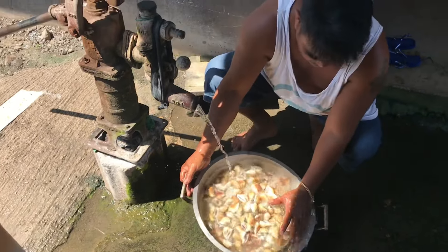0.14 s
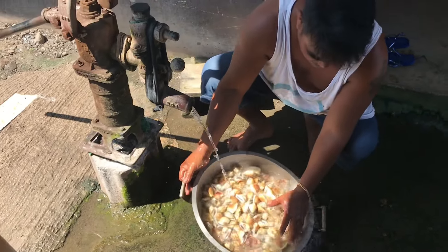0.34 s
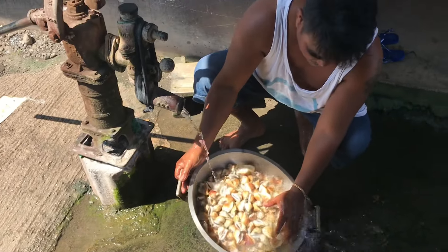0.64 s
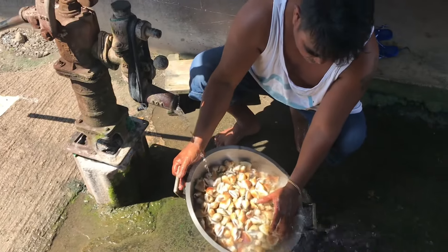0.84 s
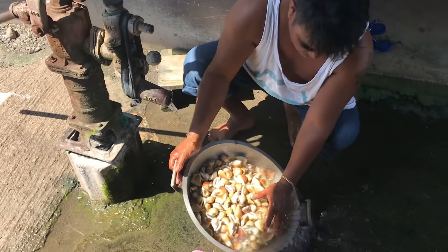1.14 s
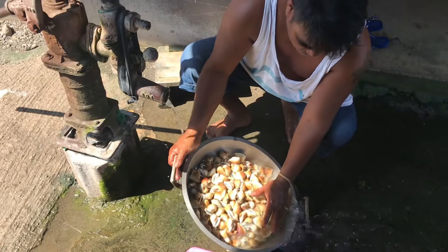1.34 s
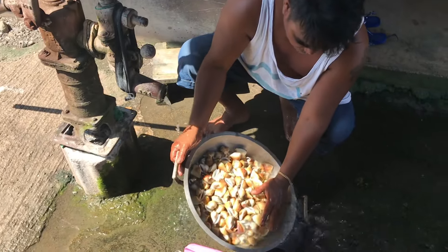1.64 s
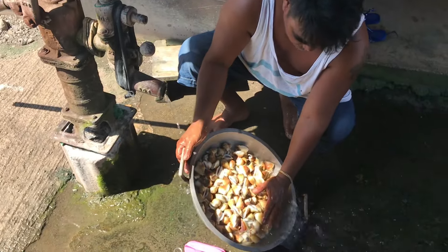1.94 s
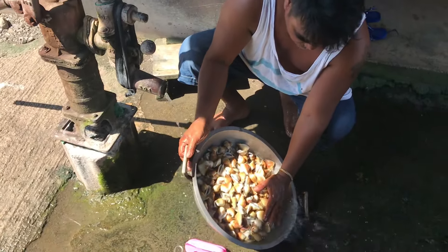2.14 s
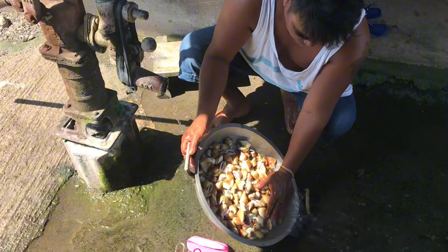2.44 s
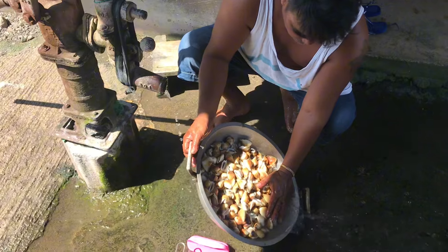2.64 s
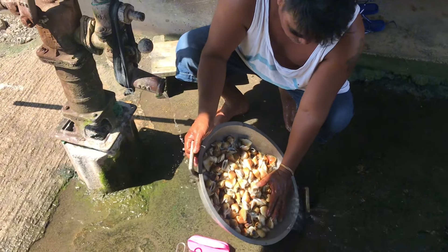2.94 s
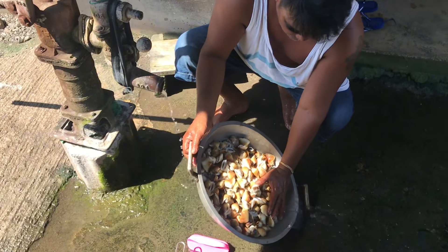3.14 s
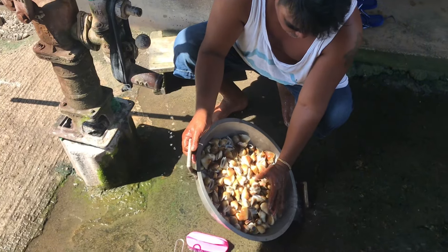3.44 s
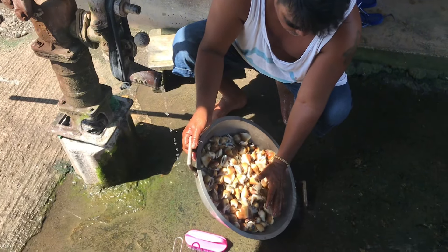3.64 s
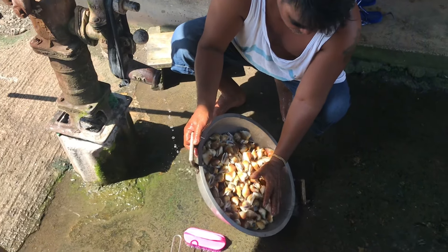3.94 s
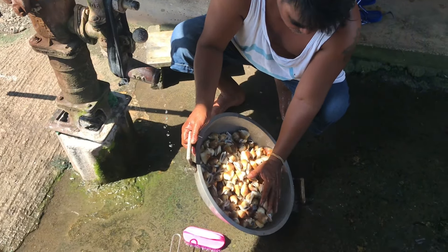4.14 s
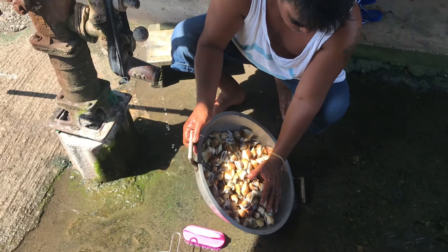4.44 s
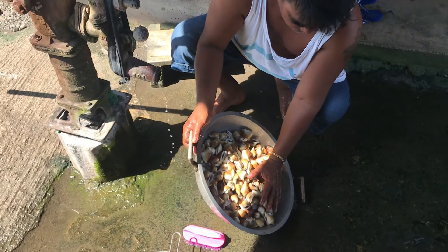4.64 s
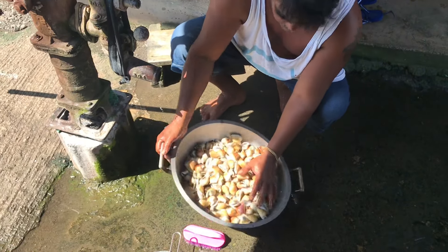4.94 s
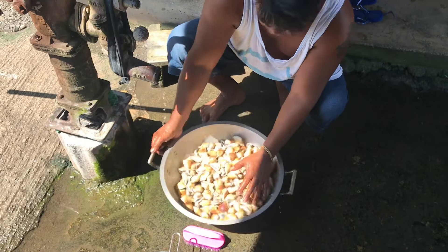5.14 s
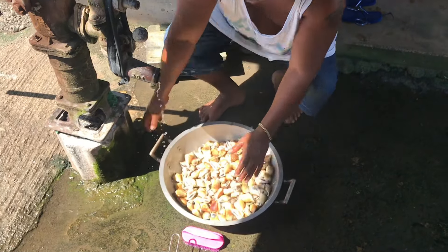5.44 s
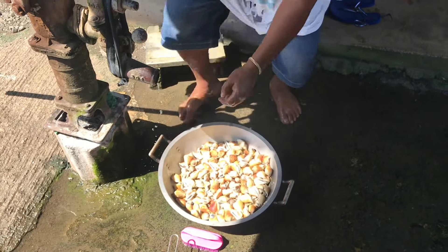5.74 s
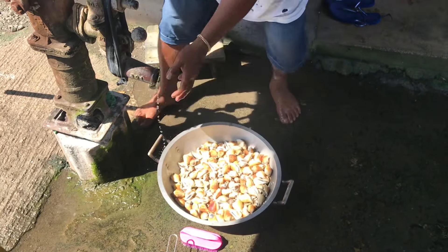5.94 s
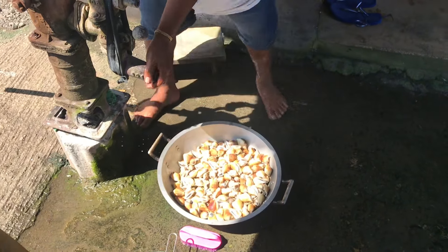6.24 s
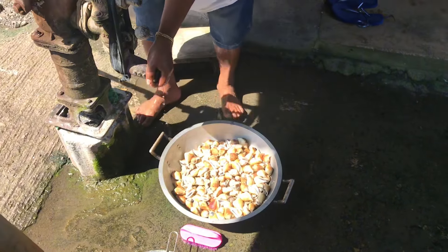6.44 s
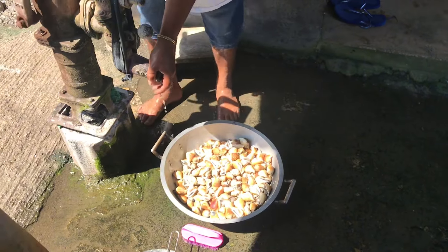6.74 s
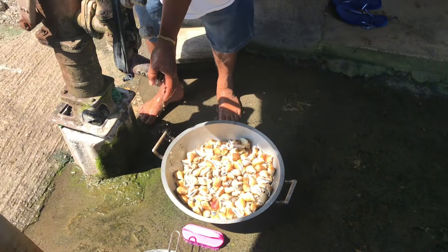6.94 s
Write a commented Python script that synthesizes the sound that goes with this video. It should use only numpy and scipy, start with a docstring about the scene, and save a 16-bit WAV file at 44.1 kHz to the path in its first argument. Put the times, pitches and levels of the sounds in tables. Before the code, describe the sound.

Shells click and slide in a draining metal basin, hit hardest as it is set down; later a loose iron pump handle clanks repeatedly.

```python
"""Shells clink and slide in a metal basin being drained and shaken beside an iron hand pump on a concrete yard.
Each clink is a noise crack with sine rings; a handle pings on its lug and the basin is set down with a crunch.
Then the pump lever clanks as ringing iron modes with a noise crash, and its pivot hisses in narrow bands.
Water spatters and gurgles away as noise, ringing clicks and rising sines.
A far engine is narrow noise bands; rumble and insects are a steady bed of coloured noise."""
import sys
import numpy as np
from scipy import signal
from scipy.fft import rfft, irfft
from scipy.io import wavfile

SR = 44100
rng = np.random.default_rng(int(sys.argv[2]) if len(sys.argv) > 2 else 0)


def transcribe(signal):
    """Save signal, clipped to [-1, 1], as a 16-bit WAV file at the path in sys.argv[1]."""
    frames = np.atleast_2d(signal).T
    limited = np.clip(frames, -1, 1)
    pcm = np.round(limited * 32767).astype(np.int16)
    wavfile.write(sys.argv[1], SR, pcm)


N = 311787
TIME = np.arange(N) / SR
EDGES = 25 * 2 ** np.arange(0, 9.5, 1 / 3)   # third-octave band edges, f/Hz
CENTRES = np.sqrt(EDGES[1:] * EDGES[:-1])

# Event and curve levels are mix settings; some source functions trim them further.
# shell clinks: [t/s, level/dB, hollow f/Hz, weight/dB, brightness/dB, edge/dB, rim f/Hz, crack t60/s,
# settling re crack/dB]
SHELL_CLINKS = [(0.0054, -33, 3320, -29, -4, -11, 6820, 0.024, -11),
                (0.0288, -22.5, 3360, -40, -14.5, -19, 7700, 0.014, -20),
                (0.045, -33, 3560, -28, -4, -15, 6400, 0.022, -17),
                (0.0745, -34, 3160, -42, -14, -6, 9140, 0.03, -16),
                (0.1394, -26, 5220, -49, -19, -19, 9200, 0.018, -19),
                (0.169, -34, 3040, -27, -15, -21, 7100, 0.023, -24),
                (0.2254, -28.5, 3270, -43, -21, -25, 10900, 0.023, -21),
                (0.2537, -27.5, 4180, -40, -23, -20, 8600, 0.024, -19),
                (0.2815, -37, 3430, -45, -15, -12, 11500, 0.032, -23),
                (0.319, -29, 3580, -53, -20, -25, 8920, 0.032, -27),
                (0.3601, -58, 2480, -28, -19, -10, 11000, 0.023, -23),
                (0.3701, -45, 2300, -44, -18, 4, 13000, 0.018, -19),
                (0.413, -25, 4000, -49, -15, -35, 7150, 0.022, -13.5),
                (0.4596, -28, 2600, -35, -8, -30, 6980, 0.021, -22),
                (0.4848, -26, 4580, -23, -19, -21, 6890, 0.034, -20),
                (0.5177, -35, 3660, -11, -9, -24, 7000, 0.025, -19),
                (0.5496, -26, 3230, -35, -7, -20, 6300, 0.021, -38),
                (0.5588, -26.5, 5730, -42, -9, -10, 6840, 0.023, -32),
                (0.6564, -31, 2180, -22, -25, -3, 11300, 0.018, -19),
                (0.9214, -32, 3140, -26, -8, -31, 6860, 0.023, -22),
                (0.9956, -26.5, 4800, -27, -26, -27, 8840, 0.021, -28),
                (1.1134, -33, 3000, -23, -28, -29, 11700, 0.035, -19),
                (1.168, -35.5, 3100, -15, -36, -24, 6720, 0.033, -24),
                (1.1858, -32, 3120, -17, -27, -24, 6580, 0.038, -20),
                (1.269, -36, 3250, -14, -15, -6, 11200, 0.011, -10),
                (1.2974, -37, 2940, -22, -26, -16, 6510, 0.022, -6),
                (1.3304, -33, 2770, -26, -20, -18, 8910, 0.024, -19),
                (1.3808, -41, 3930, -28, -9, -20, 7240, 0.023, -24),
                (1.4002, -37, 4460, -25, -13, -11, 12700, 0.02, -22),
                (1.4212, -32, 3400, -30, -19, -11, 11400, 0.025, -24),
                (1.4897, -36, 4540, -26, -13, -27, 6810, 0.02, -15),
                (1.5224, -38, 2950, -14, -22, -31, 7220, 0.035, -19),
                (1.6164, -34.5, 4500, -11, -21, -28, 7210, 0.036, -21),
                (1.6506, -40, 3320, -19, -28, -29, 6780, 0.017, -9),
                (1.7404, -29, 3130, -29, -30, -32, 8110, 0.029, -24),
                (1.7679, -33, 4020, -14, -21, -20, 11100, 0.042, -15),
                (1.8466, -35, 3340, -28, -20, -23, 11200, 0.027, -19),
                (1.8844, -26, 3960, -49, -27, -21, 13700, 0.027, -16),
                (1.952, -38.5, 5460, -19, -2, -5, 6920, 0.022, -7),
                (1.987, -24, 3570, -19, -11, -14, 6520, 0.02, -18),
                (2.0688, -35.5, 5140, -27, -19, -9, 11000, 0.027, -11),
                (2.145, -32, 3000, -16, -19, -20, 8770, 0.018, -31),
                (2.156, -33, 5860, -6, 2, -13, 8370, 0.021, -25),
                (2.1909, -37, 3000, -14, -15, -18, 8500, 0.011, -5.5),
                (2.296, -52, 2260, -24, -24, -23, 12700, 0.021, -19),
                (2.379, -22.5, 3560, -21, -23, -42, 8520, 0.025, -15.5),
                (2.4843, -41, 3500, -30, -15, -6, 8520, 0.027, -19),
                (2.498, -30.5, 3130, -20, -14.5, -26, 6700, 0.025, -18),
                (2.5561, -44, 3480, -6, -21, -15, 8550, 0.027, -27),
                (2.604, -49, 2920, -17, -10, -2, 9480, 0.027, -32),
                (2.6718, -58, 2380, -17, -10, -22, 9500, 0.016, -23),
                (2.7585, -47, 2900, -24, -12, -14, 6650, 0.027, -8),
                (2.8534, -44.5, 3500, -15, -26, -13, 12500, 0.027, -16),
                (2.9258, -47.5, 2430, -11, -35, -3, 9220, 0.027, 0.5),
                (3.015, -47.5, 3370, -5, -3, -9, 9100, 0.021, -7),
                (3.0737, -30, 3960, -7.5, -15, -19, 8860, 0.023, -35),
                (3.1167, -23, 3230, -19, 2, -4, 11700, 0.012, -34),
                (3.1315, -24, 3360, -7, -7.5, -20, 8700, 0.025, -30),
                (3.1477, -29, 3120, -6.5, -11, -22, 8860, 0.044, -18),
                (3.1966, -15.5, 3380, -41, -24.5, -50, 7800, 0.018, -27),
                (3.3527, -42, 3400, -16, -35, -26, 8200, 0.027, -25),
                (3.3922, -23, 3220, -20.5, -27, -27, 11400, 0.019, -25),
                (3.4391, -22.5, 3700, -18, -19, -31, 7450, 0.034, -29),
                (3.4586, -20, 3750, -17.5, -13, -32, 6900, 0.026, -17),
                (3.4974, -34, 5400, -23, -9, -16, 8390, 0.027, -19),
                (3.521, -29, 5430, -22, -8, -12, 9800, 0.031, -24),
                (3.5586, -34, 3120, -22, -30, -28, 9200, 0.02, -16),
                (3.5728, -19.5, 3620, -22, -16.5, -28, 6900, 0.047, -14.5),
                (3.61, -25, 2540, -17.5, -20, -16, 9050, 0.039, -16),
                (3.6583, -25.5, 4500, -29, -10, -25, 9200, 0.016, -30),
                (3.68, -28, 3830, -23, -13, -16, 12600, 0.022, -19),
                (3.703, -31, 3300, -23, -6, -17, 12200, 0.017, -16),
                (3.7244, -16, 3270, -25.5, -14, -19.5, 8990, 0.028, -17.5),
                (3.7917, -46, 2580, 0, -6, -20, 8300, 0.033, -9),
                (3.8168, -26.5, 3400, -13, -10, -25, 9200, 0.021, -25),
                (3.8257, -25.5, 3680, -14.5, -6, -26, 7980, 0.029, -15.5),
                (3.8966, -33, 3100, -26, 2.5, 1, 9500, 0.012, -24),
                (3.925, -39, 3030, -1, -12, -23, 9260, 0.024, -7),
                (3.94, -33, 3030, -20, -13, -6, 7130, 0.021, -15),
                (3.9576, -21.5, 3620, -30, -16, -8, 12000, 0.045, -23),
                (3.98, -12, 4990, -17.5, -14, -25, 9060, 0.031, -11.5),
                (4.0739, -26.5, 3320, -20, 0.5, -18, 7900, 0.027, -21),
                (4.1016, -17.5, 3630, -16.5, -12, -28, 7700, 0.022, -19.5),
                (4.1647, -30, 3550, -26, -9, -21, 7880, 0.02, -17),
                (4.1955, -10.5, 3290, -18.5, -11, -17, 8750, 0.025, -20),
                (4.1996, -9, 2420, -17, -13, -10, 7920, 0.014, -15),
                (4.345, -38.5, 3740, 2.5, -11, -30, 8000, 0.012, -13.5),
                (4.3792, -29.5, 3810, -14, -20, -16.5, 6660, 0.015, -16),
                (4.5361, -48, 5990, -24, -11, -8, 8300, 0.025, -37),
                (4.7134, -42, 3480, -11, -19, -20, 6710, 0.027, -18),
                (4.7922, -39, 3460, -10, -14, -12, 8500, 0.015, -24),
                (4.818, -23, 3360, -26, -22, -41, 6650, 0.031, -16),
                (4.8436, -26.5, 3670, -11, -19, -19, 7480, 0.027, -29),
                (4.8536, -39.5, 3060, -3, 9, -10, 9040, 0.032, -20),
                (4.8769, -15, 3320, -13.5, -9, -26, 6740, 0.017, -15.5),
                (5.0077, -38, 2840, -6, -14, -19, 6660, 0.031, -22),
                (5.0276, -47.5, 2260, -16, -10, -17, 9280, 0.027, -28),
                (5.0918, -35.5, 3630, -4.5, -16, -16, 7040, 0.023, -2),
                (5.1203, -24.5, 2920, -12, -12, -14, 7080, 0.024, -12),
                (5.1351, -18, 2450, -1.5, -20, -14, 8600, 0.03, -17),
                (5.1423, -18.5, 3170, -14, -4.5, -6, 9440, 0.056, -19),
                (5.1884, -9, 4690, -25, -17, -22, 6500, 0.042, -14),
                (5.2137, -4, 3940, -30, -25, -15.5, 11030, 0.022, -11.5),
                (5.6122, -38, 2640, -16, -13.5, -20, 11800, 0.029, -24),
                (5.696, -28, 3070, -29.5, -41, -29, 7940, 0.043, -19.5),
                (5.862, -47, 2880, -51, -9.5, -27, 7000, 0.027, -2.5),
                (5.932, -36.5, 3820, -24, -10.5, -13, 8190, 0.031, -21),
                (6.0235, -44, 2270, -29, -39, -27.5, 8100, 0.027, -5),
                (6.1923, -51.5, 3500, -17, -6, -21, 8150, 0.027, -16),
                (6.2126, -51, 4370, -22, -3, -6, 7630, 0.027, -17),
                (6.2407, -49, 6020, -30, -10, -6, 8160, 0.025, -4)]
# where weight (first two), brightness and edge act on the crack: [f/Hz]
CRACK_COLOUR_HZ = 350, 800, 8200, 12500
# colour shared by every shell at those four places: [level/dB]
CRACK_COLOUR_DB = -8, 4.5, 5.5, 12.5
CRACK_DB, HOLLOW_DB, SETTLE_T60_S = -17, -12.5, 0.22   # crack and hollow re the clink level
RIM_DB, RIM_LASTS = -2, 0.72   # rim ring re the stronger of brightness and edge; share of the crack's t60

# slides of the heap: [t/s, length/s, rattle level/dB, thud level/dB]
HEAP_SLIDES = [(3.068, 0.14, -51.5, -65), (3.52, .6, -53.5, -71), (4.199, .05, -40, -63),
               (4.696, 0.063, -56.5, -65), (4.812, 0.13, -51.5, -57), (5.117, .06, -32, -38),
               (5.187, 0.02, -23, -39)]
# colour of the sliding contacts: [f/Hz, level/dB per Hz]
HEAP_SPECTRUM = [(240, -46), (400, -50.5), (607, -22), (697, 5), (865, -10), (1090, 3.5), (2400, -5),
                 (3470, 8), (7510, -9.5), (9470, -4), (10200, -33), (11200, -7), (16000, -30.5)]
SLIDE_ATTACK_S, RATTLE_DIES_DB_PER_S, THUD_DIES_DB_PER_S = 0.01, 250.5, 501

# basin handle striking its lug: [t/s, level/dB]
HANDLE_PINGS = [(4.0736, -25.5), (4.1021, -29), (4.1649, -24), (4.2009, -3.5), (5.1427, -21.5),
                (5.2195, -22)]
# ringing modes of the handle: [f/Hz, level/dB, t60/s]
HANDLE_MODES = [(7910, -6, .04), (7900, -21, 0.19), (7980, -22.5, 0.23), (12000, -20.5, 0.02)]

# lever clanks: [t/s, crash level/dB, crash t60/s, freedom to ring (1 = undamped), low knock level/dB,
# ringing level/dB, ringing tilt/dB per octave, favoured f/Hz, deepest mode level/dB]
LEVER_CLANKS = [(6.2965, -26, .12, .9, -36.5, -69, -9, 7250, -41),
                (6.3079, -9, 0.047, 1, -66, -41, -2, 9400, -41),
                (6.349, -16.5, 0.058, .99, -61, -46, 2, 5600, -42),
                (6.3758, -33, 0.061, 1, -61, -44, -9, 3700, -41),
                (6.3877, -4.5, 0.24, .99, -32, -30.5, 5.5, 3620, -23),
                (6.4873, -4, 0.094, 0.91, -59, -31, 2, 2700, -34),
                (6.535, -6.5, 0.097, 0.96, -27.5, -31.5, 2, 7830, -54),
                (6.6939, -12.5, 0.079, 0.69, -44, -52, -4, 6260, -54),
                (6.721, -14, 0.033, .99, -33, -49, -11, 2690, -35),
                (6.7428, -9.5, 0.21, 0.89, -24, -32.5, -4, 6010, -27),
                (6.8185, -6.5, 0.12, 0.91, -25.5, -33.5, 5.5, 4410, -17.5),
                (6.9248, -15, .12, .6, -65, -41, -4, 3700, -60),
                (6.9373, -6, .13, 0.55, -30, -31, 3, 6540, -52),
                (6.955, -12, .05, .55, -24, -48, 6, 6540, -55),
                (6.996, -18.5, 0.14, 0.66, -28.5, -54, 5, 3700, -58),
                (7.052, -21, .05, .55, -31, -62, .1, 3700, -65)]
# pitches of the iron casting's modes: [f/Hz]
IRON_MODES_HZ = [1376, 1976, 2571, 2823, 3010, 3644, 3741, 4018, 4409, 4791, 5000, 5500, 5945, 6237, 6450,
                 7181, 7342, 7750, 8442, 8796, 9164, 9507, 10240, 10650, 11080, 11700, 12660, 13300, 13900,
                 15280]
# the same modes in the same order: [level/dB, basic t60/s]
IRON_MODES = [(-2, 0.11), (-12.5, 0.12), (-7, 0.091), (-8.5, 0.16), (-1, 0.17), (-13, 0.18), (-7, 0.18),
              (-16, 0.085), (-6, 0.21), (-26, 0.13), (-18, 0.099), (-11, 0.11), (-7.5, 0.25), (-1.5, 0.08),
              (-19, 0.12), (-2, 0.083), (-12, 0.096), (-19, .13), (-11.5, 0.16), (-9, 0.24), (-3, 0.047),
              (-8, 0.099), (-10, 0.065), (-12, 0.064), (-18, .1), (-8.5, 0.2), (-24, 0.084), (-16, 0.23),
              (-15, 0.071), (-18, 0.17)]
# dense colour of the crash and the scrape: [f/Hz, level/dB per Hz]
CRASH_SPECTRUM = [(120, -48), (200, -24.5), (1180, -8), (1370, -9.5), (1530, -4), (2910, -3.5),
                  (3310, -7.5), (3690, -3), (5230, -7), (9400, -18), (10100, -23), (11900, -28),
                  (16000, -45)]
# each mode has a softer partner, detuned at random for each blow, so the ring beats and sounds rough
TWIN_DB, TWIN_APART = -4, 0.0113   # partner re its mode; spread of the detuning as a share of the pitch
TOP_LOSS_DB, TOP_LASTS = 5, 0.71   # a blunt blow hardly reaches modes above 10 kHz, and the hand damps them
FAVOUR_DB, FAVOUR_OCTAVES = 11.5, 0.09   # modes near the favoured pitch ring louder

# the pump's stroke: [t/s, pivot hiss level/dB, pipe boom level/dB]
PUMP_STROKE = [(6.91, -91, -62), (6.94, -31, -72), (6.952, -37, -38.5), (6.986, -31, -50),
               (6.992, -43.5, -41), (7.07, -38.5, -42)]
# narrow bands of the pivot hiss: [f/Hz, width/Hz, level/dB]
PIVOT_BANDS = [(6800, 450, -3), (11700, 350, 0), (12300, 350, -2), (13700, 300, -6), (15000, 300, -12)]
# the rod in its guide: [t/s, level/dB]
ROD_SCRAPE = [(6.3, -73), (6.56, -39.5), (7.07, -33.5)]
PIPE_FROM_S, PIPE_DB = 6.3, -57   # the pipe drones once the lever is in the hand

# draining water: [t/s, flow level/dB, bubbling re flow/dB, fine ticking re flow/dB]
DRAIN_FLOW = [(0, -46.5, -11, -12), (.85, -42.5, -0.5, -11.5), (1.1, -49, 7, -16), (1.5, -49, -3.5, -19),
              (2.1, -49, 6, -14.5), (2.3, -52, 9.5, -13), (2.7, -56.5, 8, -9.5), (3.4, -54.5, -7, -21),
              (3.6, -53.5, 5, -5), (4.25, -58, 12.5, -12), (4.4, -66.5, -5, -6.5), (5.0, -61.5, 8, -8.5),
              (5.4, -59, 6, -13.5), (6.3, -68, -5.5, -16)]
# colour of the spatter: [f/Hz, level/dB per Hz]
SPATTER_SPECTRUM = [(180, -37.5), (300, -6), (447, -62), (519, 12), (713, -48.5), (1040, 2), (2100, 0),
                    (3080, -1), (12300, -12), (16000, -9.5)]
BRIGHT_AT_DB, BRIGHT_PER_DB = -50, 0.5142   # flow with no added tilt; tilt/dB per two octaves per dB of flow
# gurgles: [t/s, level/dB, starting f/Hz, ring length to -60 dB/cycles]
AIR_GURGLES = [(0.141, -50.5, 1190, 50), (0.167, -41.5, 1090, 44.0), (0.313, -55, 1150, 34),
               (0.36, -37, 2230, 44.0), (0.411, -40, 2220, 44.0), (0.441, -46.5, 926, 40),
               (0.458, -45, 2300, 44.0), (0.479, -49, 950, 44.0), (0.549, -36, 2330, 44.0),
               (0.665, -40, 1215, 38), (0.669, -37, 1350, 53), (0.728, -37, 2140, 44.0),
               (0.756, -53, 1480, 44.0), (0.772, -42, 1620, 44.0), (0.82, -29, 1600, 15),
               (0.913, -54, 1680, 44.0), (0.932, -44, 1610, 44.0), (0.973, -38.5, 2020, 42),
               (1.025, -35.5, 1080, 39), (1.057, -41, 1110, 44.0), (1.133, -39, 925, 46),
               (1.152, -49, 930, 44.0), (1.172, -41, 1027, 71), (1.199, -40.5, 1015, 48),
               (1.238, -40.5, 1050, 37), (1.27, -50, 1020, 49), (1.31, -38.5, 1890, 38),
               (1.439, -43.5, 1320, 53), (1.503, -42, 2020, 48), (1.571, -33, 1504, 44.0),
               (1.616, -33.5, 1780, 39), (1.65, -41, 1760, 40), (1.729, -35.5, 1147, 44.0),
               (1.768, -37, 1960, 39), (1.85, -44.5, 900, 47), (1.902, -41, 2240, 44.0),
               (1.916, -38.5, 1660, 44.0), (1.967, -44, 1540, 44.0), (1.987, -36, 1870, 44.0),
               (2.032, -40, 1380, 52), (2.081, -40.5, 1650, 44.0), (2.124, -46, 1060, 44.0),
               (2.145, -42, 1660, 44.0), (2.185, -37.5, 1770, 47), (2.225, -33, 2130, 44.0),
               (2.298, -37.5, 2300, 44.0), (2.326, -36, 1860, 53), (2.379, -35, 2070, 49),
               (2.433, -45, 1820, 44.0), (2.451, -43, 1560, 44.0), (2.498, -47, 1640, 44.0),
               (2.702, -50, 1240, 44.0), (2.908, -48, 2030, 44.0), (2.923, -41.5, 1120, 41),
               (0.215, -52, 540, 24.0), (0.456, -58, 328, 28), (0.676, -51.5, 520, 54),
               (0.792, -49.5, 570, 37), (0.889, -52, 553, 24.0), (0.96, -59, 316, 24.0),
               (1.183, -53, 345, 38), (1.232, -54, 322, 27), (1.463, -42.5, 358, 16)]

# echo tail of the yard: [f/Hz, t60/s]
YARD_DECAY = [(300, 0.03), (1000, 0.29), (3000, 0.21), (8000, 0.15), (15000, 0.031)]

# a far engine moving off: [t/s, drone level/dB, upper hum level/dB]
FAR_ENGINE = [(0, -58.5, -66.5), (1.9, -63.5, -64.5), (2.6, -61, -71), (4.4, -62.5, -75.5),
              (5.8, -60.5, -72), (6.3, -69.5, -76.5), (7.07, -72, -76)]
# hum lines above the drone: [f/Hz, width/Hz, level/dB]
HUM_LINES = [(259, 18, -2.5), (318.5, 20, 1.5), (385, 5.1, -3.5)]
# colour of the bed of rumble and insects: [f/Hz, level/dB per Hz]
AMBIENCE_SPECTRUM = [(15, -34.5), (25, 5), (74, -3.5), (312, -18), (388, -21), (508, -24.5), (806, -15.5),
                     (949, -27), (3310, -28.5), (4840, -27), (7270, -35.5), (8320, -22.5), (10100, -36.5),
                     (13200, -29.5), (16400, -28.5)]
AMBIENCE_DB = -60.5
CUTOFF_HZ = 15700


def amp(db):
    """dB to gain."""
    return 10 ** (np.asarray(db) / 20)


def rms_one(x):
    """Scale to rms 1."""
    return x / np.sqrt(np.mean(x ** 2) + 1e-20)


def in_time(rows):
    """Read the columns of a curve at every sample; -120 dB outside its span."""
    s, *columns = np.transpose(rows)
    return [np.interp(TIME, s, c, left=-120, right=-120) for c in columns]


def at_hz(points, hz):
    """Read a spectrum on a log-frequency axis."""
    points = np.array(points)
    return np.interp(np.log(hz), np.log(points[:, 0]), points[:, 1])


def drift(rate_hz):
    """Slow random wander of spread 1: noise through two equal low-pass poles, computed every 40 samples."""
    r = np.exp(-80 * np.pi * rate_hz / SR)
    slow = signal.lfilter([1], [1, -2 * r, r * r], rng.standard_normal(N // 40 + 2002))[2000:]
    return np.interp(np.arange(N) / 40, np.arange(len(slow)), rms_one(slow))


def fade(t60, size):
    """Exponential decay from 1, falling 60 dB in t60 seconds."""
    return amp(-60 * np.arange(size) / SR / max(t60, .004))


def ring(clicks, hz, t60):
    """Two-pole resonator: a unit click sets a decaying sine of height 1 ringing."""
    r, w = amp(-60 / (t60 * SR)), 2 * np.pi * hz / SR
    return signal.lfilter([0, np.sin(w)], [1, -2 * r * np.cos(w), r * r], clicks + 1e-18)


def bandpass(x, low_hz, high_hz):
    """Keep the range between two frequencies."""
    return signal.sosfilt(signal.butter(2, [low_hz, high_hz], "band", fs=SR, output="sos"), x)


def bank(first, second):
    """Third-octave bands; neighbours take unrelated inputs."""
    return np.array([bandpass((first, second)[k % 2], EDGES[k], EDGES[k + 1]) for k in range(len(CENTRES))])


def coloured(x, spectrum):
    """Give a white signal a spectrum; rms 1."""
    hz = np.maximum(np.arange(N // 2 + 1) * SR / N, 1)
    return rms_one(irfft(rfft(x) * amp(at_hz(spectrum, hz)), N))


def bands_of_hiss(peaks):
    """Noise through narrow resonances; rms 1."""
    total = np.zeros(N)
    for hz, width_hz, db in peaks:
        t60 = np.log(1000) / np.pi / width_hz   # a narrow band rings long
        total += amp(db) * rms_one(ring(rng.standard_normal(N), hz, t60))
    return rms_one(total)


def grains(per_s, spread_db):
    """Random clicks of very uneven size and either sign."""
    sizes = amp(spread_db * np.minimum(rng.exponential(1, N), 5)) * rng.choice([-1, 1], N)
    return sizes * (rng.random(N) < per_s / SR)


def struck(events, modes, scatter_db):
    """Resonant modes in parallel: each blow strikes every mode with a strength of its own."""
    events, out = np.array(events), np.zeros(N)
    at = (events[:, 0] * SR).astype(int)
    chance = rng.standard_normal((len(at), len(modes)))
    for k, (hz, level_db, t60) in enumerate(modes):
        clicks = np.zeros(N)
        clicks[at] = amp(events[:, 1] + level_db + scatter_db * chance[:, k])
        out += ring(clicks, hz, min(t60, .4))
    return out


def clinks(noise):
    """A short coloured crack at each contact, brief rings of hollow and rim, then the neighbours settle."""
    out, unit = np.zeros(N), noise / noise.std(axis=1)[:, None]
    chance = rng.standard_normal((len(SHELL_CLINKS), len(CENTRES)))
    reach = (CENTRES > 420) * amp(-8.0 * (CENTRES > 13500))   # small hard bodies: no bass, less extreme treble
    rough = 1.1 + 0.27 * drift(190)   # touching neighbours make the ring of a shell uneven
    grit = amp(3.5 * drift(90))   # the settling comes in small separate contacts
    dull = amp(-4.0 * np.maximum(np.log2(CENTRES / 5000), 0))   # the settling has less treble than the crack
    for row, luck in zip(SHELL_CLINKS, chance):
        s, level_db, hollow_hz, weight_db, bright_db, edge_db, rim_hz, t60, settle_db = row
        i = int(s * SR)
        size = min(9000, N - i)
        span, t = slice(i, i + size), TIME[:size]
        own_db = np.array([weight_db, weight_db, bright_db, edge_db])
        colour = np.transpose([CRACK_COLOUR_HZ, CRACK_COLOUR_DB + own_db])
        colour = np.insert(colour, 2, (hollow_hz, 0), axis=0)   # a 0 dB point at the pitch of the hollow
        gains = amp(level_db + CRACK_DB + at_hz(colour, CENTRES) + 1.4 * luck) * reach
        rise = np.minimum(t / 0.00052, 1)   # a contact takes a moment to build
        out[span] += gains @ unit[:, span] * fade(t60, size) * rise

        hollow = amp(level_db + HOLLOW_DB) * np.sin(2 * np.pi * hollow_hz * t)
        out[span] += hollow * fade(t60, size) * rough[span]
        rim = amp(level_db + max(bright_db, edge_db) + RIM_DB) * np.sin(2 * np.pi * rim_hz * t)
        out[span] += rim * fade(RIM_LASTS * t60, size) * rough[span]

        # the settling leans to the pitch of the hollow
        lean = 1 + 0.9 * np.exp(-(np.log2(CENTRES / hollow_hz) / 0.3) ** 2)
        settling = (gains * dull * lean) @ unit[:, span] * fade(SETTLE_T60_S, size)
        out[span] += amp(settle_db) * settling * rise * grit[span]
    return out


def heap():
    """Countless small contacts in clumps as the shells slide; the basin floor thuds under them."""
    rattle_gain, thud_gain = np.zeros((2, N))
    for s, length, rattle_db, thud_db in HEAP_SLIDES:
        rise, after = np.clip((TIME - s) / SLIDE_ATTACK_S, 0, 1), np.maximum(TIME - s - length, 0)
        rattle_gain = np.maximum(rattle_gain, rise * amp(rattle_db - RATTLE_DIES_DB_PER_S * after))
        thud_gain = np.maximum(thud_gain, rise * amp(thud_db - THUD_DIES_DB_PER_S * after))
    contacts = grains(9000 * amp(3 * drift(40)), spread_db=2.5)
    thud = rms_one(bandpass(rng.standard_normal(N), 70, 500))
    return rattle_gain * coloured(contacts, HEAP_SPECTRUM) + thud_gain * thud


def handle_pings():
    """The basin handle strikes its lug and rings in a few high modes."""
    return amp(-3.5) * struck(HANDLE_PINGS, HANDLE_MODES, scatter_db=-0.5)


def lever():
    """Loose iron joints: each blow rings the casting's modes, with a dense crash and a low knock."""
    out, iron_hz = np.zeros(N), np.array(IRON_MODES_HZ)
    level_db, ring_t60 = np.transpose(IRON_MODES)
    ring_t60 = ring_t60 * np.where(iron_hz > 10000, TOP_LASTS, 1)
    above_deepest = iron_hz > iron_hz[0]
    crash = coloured(rng.standard_normal(N), CRASH_SPECTRUM)
    knock = rms_one(bandpass(rng.standard_normal(N), 150, 900))
    chance = rng.standard_normal((len(LEVER_CLANKS), 3, len(IRON_MODES)))
    for row, (luck, turns, apart) in zip(LEVER_CLANKS, chance):
        s, crash_db, crash_t60, free, knock_db, ringing_db, tilt_db, favoured_hz, deepest_db = row
        i = int(s * SR)
        size = min(16000, N - i)
        span, t = slice(i, i + size), TIME[:size]
        tilted_db = ringing_db + tilt_db * np.log2(iron_hz / 5000) - TOP_LOSS_DB * (iron_hz > 10000)
        favour_db = FAVOUR_DB * np.exp(-(np.log2(iron_hz / favoured_hz) / FAVOUR_OCTAVES) ** 2)
        struck_db = np.where(above_deepest, tilted_db + favour_db, deepest_db)
        scatter_db = 3 * luck * above_deepest   # the deepest mode is not left to chance
        gains = amp(struck_db + level_db + scatter_db + 3.0)

        ringing = np.zeros(size)
        for gain, hz, t60, turn, detune in zip(gains, iron_hz, ring_t60, turns, TWIN_APART * apart):
            mode = np.sin(2 * np.pi * (hz * t + turn))
            twin = amp(TWIN_DB) * np.sin(2 * np.pi * hz * (1 + detune) * t)
            ringing += gain * (mode + twin) * fade(free * t60, size)
        out[span] += ringing * np.minimum(t / 0.0023, 1)

        chatter = np.minimum(2.0 * fade(crash_t60, size), 1)   # chatters on a moment before it dies away
        out[span] += amp(crash_db - 24.0) * crash[span] * chatter
        out[span] += amp(knock_db - 11.5) * knock[span] * fade(0.12, size)
    return out


def stroke():
    """The dry pivot hisses in narrow bands, the pipe booms and drones, and the rod scrapes in its guide."""
    hiss_db, boom_db = in_time(PUMP_STROKE)
    scrape_db, = in_time(ROD_SCRAPE)
    boom = bands_of_hiss([(119.3, 110, -0.5), (282.0, 120, -0.98)]) * amp(3.3 * drift(25))
    scrape = coloured(grains(8100, spread_db=5.0), CRASH_SPECTRUM)
    hiss = bands_of_hiss(PIVOT_BANDS) * amp(1.3 * drift(53))
    drone = amp(PIPE_DB) * (TIME > PIPE_FROM_S) * bands_of_hiss([(324, 135, 0)])
    return amp(hiss_db) * hiss + amp(boom_db - 6.0) * boom + amp(scrape_db - 10) * scrape + drone


def water(noise):
    """Patchy spray, droplets ringing a few cycles, bubbles in the run-off; a fuller flow sprays brighter."""
    flow_db, bubbling_db, ticking_db = in_time(DRAIN_FLOW)
    tilt_db = BRIGHT_PER_DB * np.maximum(flow_db - BRIGHT_AT_DB, -15)
    together = drift(21)   # a wander shared by the spray bands and the droplets
    spray_hz, spray_noise = CENTRES[10:], noise[10:]
    spray = np.zeros(N)
    for hz, band in zip(spray_hz, spray_noise):
        band_db = at_hz(SPATTER_SPECTRUM, hz) + tilt_db * np.log2(hz / 2000) / 2
        spray += amp(band_db + 0.48 * together + 3.6 * drift(32)) * band
    spray_scale = np.sqrt(np.sum(amp(2 * at_hz(SPATTER_SPECTRUM, spray_hz)) * spray_noise.var(axis=1)))

    drops = grains(900 * amp(4 * together), spread_db=2.0)
    dealt = rng.integers(0, 12, N)   # which of twelve pitches a click rings
    drips = sum(amp(at_hz(SPATTER_SPECTRUM, hz)) * ring(drops * (dealt == k), hz, 39.0 / hz)
                for k, hz in enumerate(np.geomspace(2500, 11000, 12)))
    pockets = grains(550 * amp(3.5 * drift(3.1)), spread_db=3.5)
    bubbles = sum(ring(pockets * (dealt == k), hz, 55.0 / hz)
                  for k, hz in enumerate(np.geomspace(950, 3300, 12)))
    bubbles = signal.lfilter([.15], [1, -.85], bubbles)   # bubbles start softly
    specks = grains(120, spread_db=3.5)   # the finest drops tick on the concrete
    ticks = sum(ring(specks * (dealt % 4 == k), hz, 10.0 / hz)
                for k, hz in enumerate([7000, 8940, 11500, 13950]))

    mix = amp(ticking_db) * rms_one(ticks) + amp(-8.0) * spray / spray_scale
    mix += amp(-12.5) * rms_one(drips) + amp(bubbling_db - 17.5) * rms_one(bubbles)
    return amp(flow_db) * mix


def gurgles():
    """Trapped air rings like a bubble and rises in pitch near the surface; smaller neighbours follow it."""
    out, size = np.zeros(N), 4000
    t = TIME[:size]
    chance = rng.random((len(AIR_GURGLES), 3, 2))
    for (s, level_db, hz, cycles), luck in zip(AIR_GURGLES, chance):
        envelope = fade(cycles / hz, size) * np.minimum(t / 0.0017, 1)
        for k, (late, off) in enumerate(luck):   # the gurgle itself, then two neighbours
            bubble_hz = hz * (1 + 0.12 * k * (off - .5))
            tone = np.sin(2 * np.pi * bubble_hz * t * (0.997 + 0.73 * t))
            i = int((s + 0.007 * k * late) * SR)
            out[i:i + size] += amp(level_db - 3.5 * k) * tone * envelope
    return out


def yard(x, noise):
    """Basin walls, concrete and a wall nearby return a tail of noise that dies band by band."""
    size = 20000
    tail = sum(band[5000:5000 + size] * fade(at_hz(YARD_DECAY, hz), size) for hz, band in zip(CENTRES, noise))
    tail = tail * np.minimum(TIME[:size] / 0.004, 1)
    return signal.fftconvolve(x, tail / np.sqrt(np.sum(tail ** 2)))[:N]


def engine():
    """A narrow noise band makes the wavering drone, with a few faint hum lines above it."""
    drone_db, hum_db = in_time(FAR_ENGINE)
    return amp(drone_db) * bands_of_hiss([(102, 16, 0)]) + amp(hum_db) * bands_of_hiss(HUM_LINES)


def ambience():
    """Rumble and insects as one steady bed of coloured noise."""
    return amp(AMBIENCE_DB) * coloured(rng.standard_normal(N), AMBIENCE_SPECTRUM)


def scene():
    """All sources, with their echo tails, over the engine and ambience."""
    noise = bank(*rng.standard_normal((2, N)))
    basin = clinks(noise) + heap() + handle_pings()
    pump = lever() + stroke()
    wet = water(noise) + gurgles()
    echoes = yard(amp(-13) * basin + amp(-14) * pump + amp(-12.5) * wet, noise)
    background = engine() + ambience()
    return (basin + pump + wet + echoes + background)[None]


def record(dry):
    """The microphone loses the deepest bass; the top is cut steeply."""
    lean = signal.sosfilt(signal.butter(4, 36, "high", fs=SR, output="sos"), dry)
    return signal.sosfilt(signal.ellip(10, .5, 80, CUTOFF_HZ, fs=SR, output="sos"), lean)


dry = scene()
out = record(dry)
transcribe(out)
```